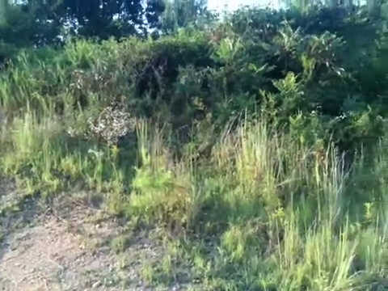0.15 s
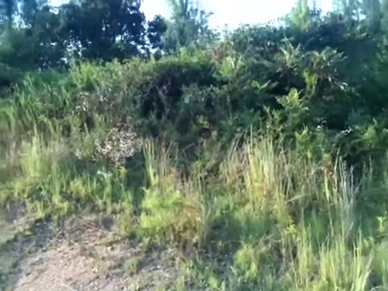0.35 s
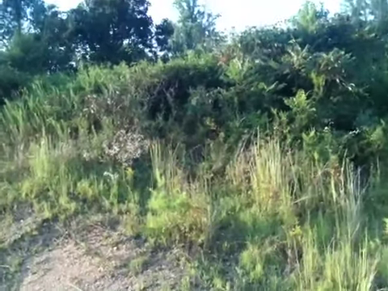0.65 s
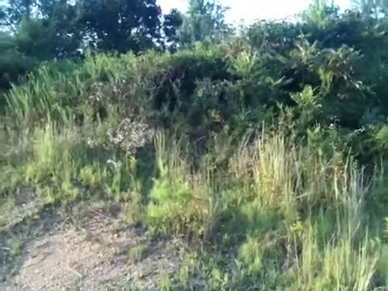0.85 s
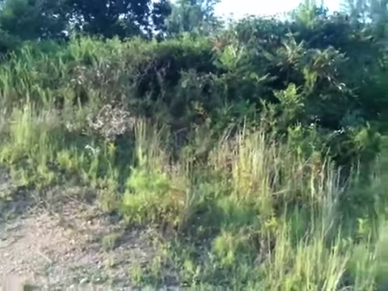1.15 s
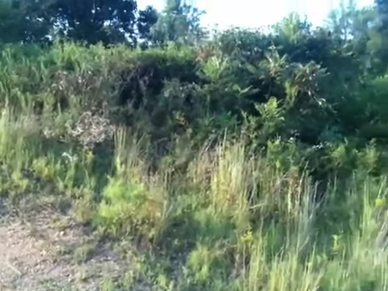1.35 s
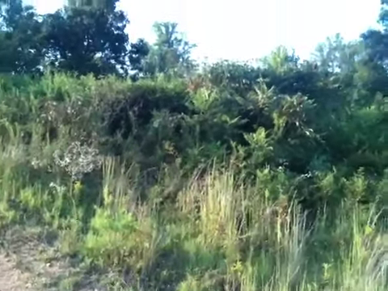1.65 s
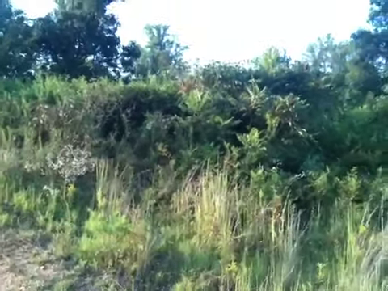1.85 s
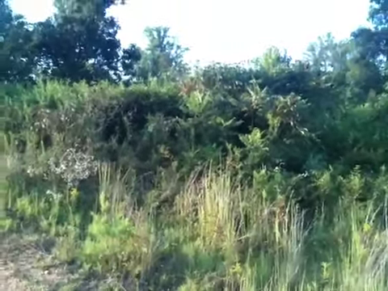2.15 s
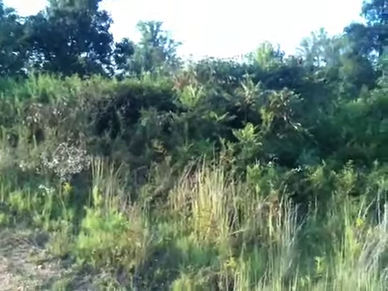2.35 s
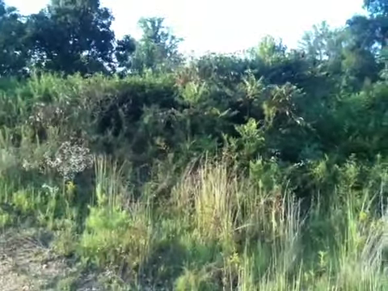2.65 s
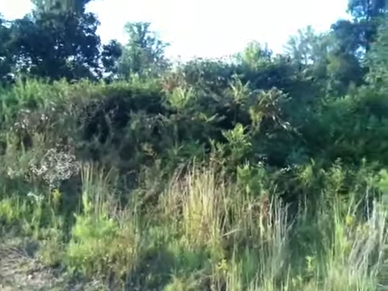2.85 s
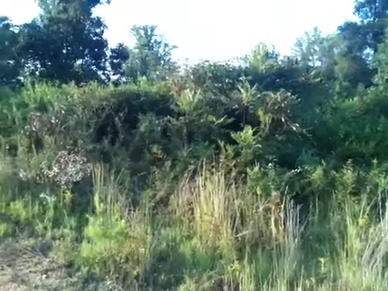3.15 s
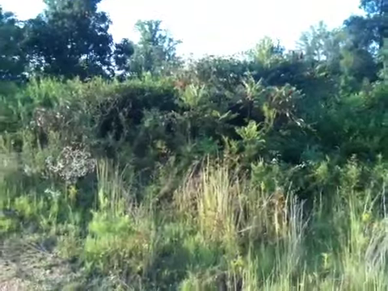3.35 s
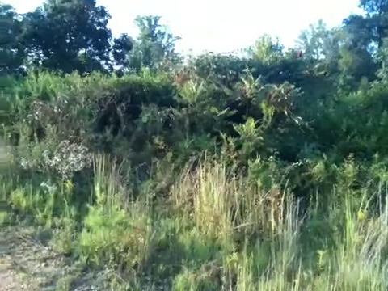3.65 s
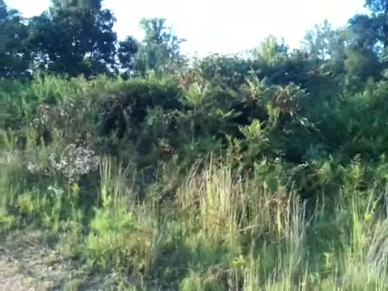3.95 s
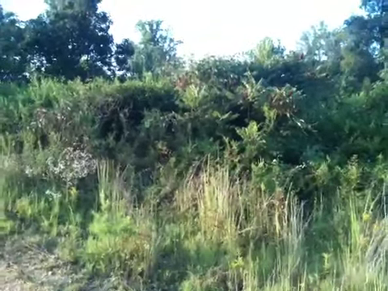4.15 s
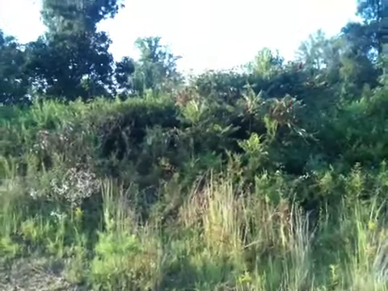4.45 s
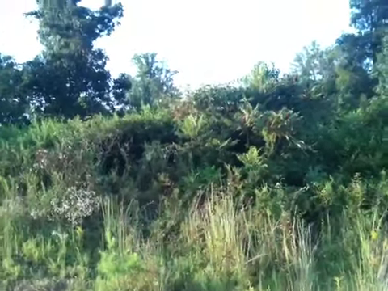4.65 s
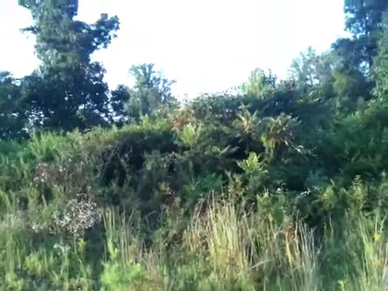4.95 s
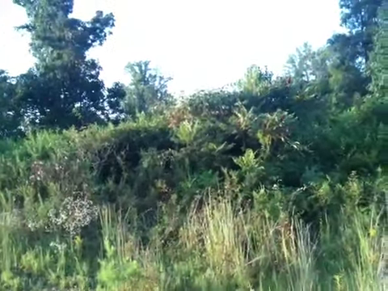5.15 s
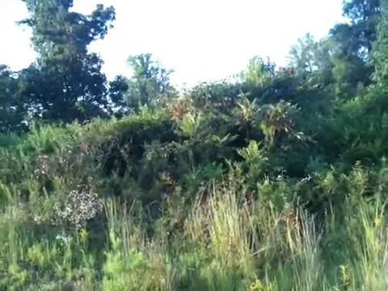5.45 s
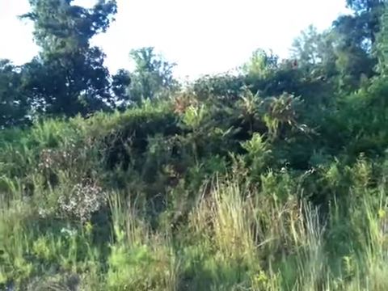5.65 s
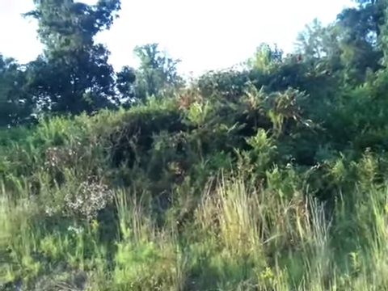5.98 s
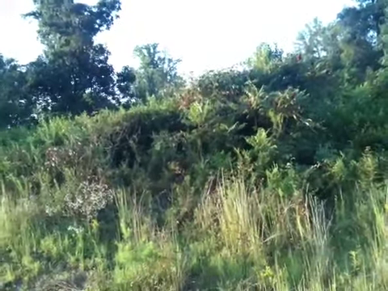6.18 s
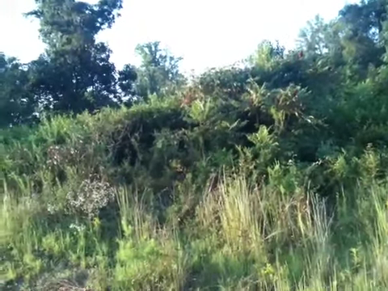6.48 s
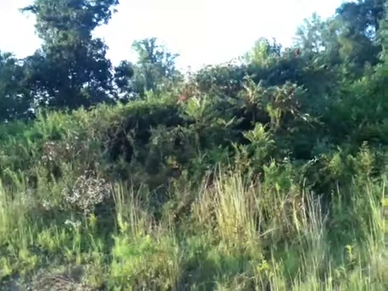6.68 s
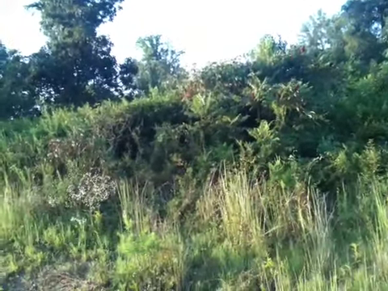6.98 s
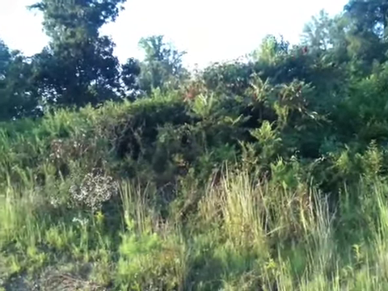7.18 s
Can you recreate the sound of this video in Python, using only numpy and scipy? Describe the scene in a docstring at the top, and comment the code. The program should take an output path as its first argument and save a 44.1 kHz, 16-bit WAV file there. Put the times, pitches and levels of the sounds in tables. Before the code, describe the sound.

A small single-cylinder four-stroke engine revs in four hard, raspy bursts beyond brush, coasting between them, then sinks toward idle amid crickets.

```python
"""A single-cylinder four-stroke engine putters some way off; a second, raspier one fades within a second.
The throttle opens in four short, hard bursts and a few gentle ones; between them the engine coasts,
and at last it sinks towards idle. Each firing rings a silencer and hisses; brush and trees scatter it.
Low tones, churn, clatter and drone follow the engine cycle. Gliding tones make crickets and noise makes
a far chorus and a late katydid; a faint bird whistles once."""
import sys
import numpy as np
from scipy import signal
from scipy.fft import rfft, irfft
from scipy.io import wavfile

SR = 44100
rng = np.random.default_rng(int(sys.argv[2]) if len(sys.argv) > 2 else 0)


def dump_mix(stems):
    """Bounce the given channels to the path in sys.argv[1] as a 16-bit WAV at rate SR."""
    frames = np.atleast_2d(stems).T  # one column per channel
    limited = np.clip(frames, -1, 1)  # hard clip at full scale
    pcm = np.round(limited * 32767).astype(np.int16)
    wavfile.write(sys.argv[1], SR, pcm)


N = 322812
TIME = np.arange(N) / SR
CRUISE_PER_S = 42   # firings at an easy pace


def from_db(db):
    """Decibels to gain."""
    return 10 ** (np.asarray(db) / 20)


def rms_one(x):
    """Scale to rms 1."""
    return x / np.sqrt(np.mean(x ** 2) + 1e-20)


def in_time(rows, t=TIME):
    """Each column of a curve, read at times t."""
    s, *columns = np.transpose(rows)
    return [np.interp(t, s, c) for c in columns]


def coloured(x, spectrum):
    """Shape a signal by a spectrum that falls 20 dB per octave faster beyond its ends; rms 1."""
    hz, db = np.transpose(spectrum)
    octave = np.log2(np.fft.rfftfreq(N, 1 / SR) + 1)
    outside = abs(octave - np.clip(octave, np.log2(hz[0]), np.log2(hz[-1])))
    gain = from_db(np.interp(octave, np.log2(hz), db) - 20 * outside)
    return rms_one(irfft(rfft(x) * gain, N))


def band(x, low_hz, high_hz, order=2):
    """Band-pass."""
    return signal.sosfilt(signal.butter(order, [low_hz, high_hz], "band", fs=SR, output="sos"), x + 1e-18)


def drift(rate):
    """Slow random curve through normal points of spread 1, rate points per second."""
    points = rng.standard_normal(400)
    return np.interp(TIME * rate, np.arange(len(points)), points)


# Speed with the throttle shut, set by ground and gear. Each row: time in seconds, firings per second.
COAST_SPEED = [(0.0, 45.61), (0.25, 44.63), (0.458, 44.43), (0.75, 40.99), (0.986, 37.94), (1.5, 38.83),
               (1.985, 40.09), (2.35, 42.14), (2.55, 42.96), (2.8, 45.42), (3.15, 43.66), (3.65, 40.57),
               (3.75, 41.85), (3.87, 40.27), (4.249, 38.23), (4.717, 38.7), (5.12, 30.59), (5.22, 27.41),
               (5.45, 29.93), (5.739, 32.9), (6.1, 31.03), (6.675, 26.81), (7.32, 26.33)]
# Throttle openings. Each row: open in seconds, shut in seconds, added firings per second if held,
# rev-up time in seconds, swell time in seconds, beat level at the crest in dB, sag in dB per second
# away from the crest, silencer pitch factor at the crest, nasal ring in dB, gas rush in dB.
THROTTLE_BURSTS = [(0.0, 0.272, 0, 0.16, 0.0091, -46, 13, 1.1, 3, 7),
                   (0.306, 0.742, 6.5, 0.19, 0.017, -44, -2, 0.97, 14.5, 4),
                   (0.926, 1.456, 25, .181, 0.002, -21, 5, 1.031, 0.5, -2.5),
                   (1.581, 1.928, 24.5, .174, 0.017, -20, 9, 1.024, 1, 0),
                   (2.041, 2.371, 24.5, .199, 0.057, -19.5, 17, 0.99, 10, -2),
                   (2.4, 2.576, 0, .1, .004, -44.5, 29.5, 0.94, 18, 0),
                   (3.728, 4.645, 6, 0.0039, 0.044, -38, 5.5, 0.94, 13.5, -4),
                   (4.829, 5.147, 21, 0.23, 0.046, -19.3, 25.5, 0.91, -2, -5.5)]
SPIN_DOWN_S = .1648


def engine_speed():
    """Firings per second: each burst pulls the flywheel above its coasting speed, then it spins down."""
    speed = in_time(COAST_SPEED)[0]
    for open_s, shut_s, added, rev_s, *_ in THROTTLE_BURSTS:
        pulled = 1 - np.exp(-(np.clip(TIME, open_s, shut_s) - open_s) / rev_s)
        spin_down = np.exp(-np.maximum(TIME - shut_s, 0) / SPIN_DOWN_S)
        speed = speed + added * pulled * spin_down
    return speed


# Beats with the throttle shut. Each row: time in seconds, beat level in dB.
PUTTER_LEVEL = [(0.3, -57), (0.8, -55), (1.5, -40.5), (2.0, -53), (2.7, -53), (3.6, -42.5), (3.72, -54),
                (4.7, -51.5), (5.19, -61.5), (5.27, -45), (5.5, -48.5), (6.1, -59), (6.7, -66)]
PUTTER_NASAL_DB, PUTTER_RUSH_DB = -2.5, 1.5
COOLING_POWER = 0.21   # coasting: silencer pitch sinks with speed as it cools
BEAT_LEAD_S, SHUT_S = 0.019, 0.014   # beats swell before the speed rises; they die quickly on shutting
FULL_REV_PER_S = 33.7   # added firings that count as full load
CREST_SHARE = 0.24   # crest of a burst, as a share of its length
RING_SAG_PER_S = 0.027   # share by which silencer pitch sinks each second of a burst


def throttle(t, speed):
    """Opening, load, beat dB, silencer pitch, nasal dB and rush dB at times t: bursts swell, sag and shut."""
    still = np.zeros(len(t))
    putter_db = in_time(PUTTER_LEVEL, t)[0]
    cooled = (speed / CRUISE_PER_S) ** COOLING_POWER
    state = np.array([still, still, putter_db, cooled, still + PUTTER_NASAL_DB, still + PUTTER_RUSH_DB])
    for open_s, shut_s, added, _, swell_s, peak_db, sag, pitch, nasal_db, rush_db in THROTTLE_BURSTS:
        swell = .5 * (1 + np.tanh((t - open_s + BEAT_LEAD_S) / swell_s))
        opening = swell * np.clip(1 - (t - shut_s) / SHUT_S, 0, 1)
        past_crest_s = t - (open_s + CREST_SHARE * (shut_s - open_s))
        beat_db = peak_db - sag * abs(past_crest_s)
        heat = pitch * (1 - RING_SAG_PER_S * past_crest_s)
        driven = np.broadcast_arrays(1, added / FULL_REV_PER_S, beat_db, heat, nasal_db, rush_db)
        state = state + opening * (np.array(driven) - state)
    return state


# Single firings that stand out, as hard pops or a misfire.
# Each row: time in seconds, peak level in dB, extra crack of gas in dB.
POP_FIRINGS = [(.306, -39, 6), (.373, -37, 1.5), (.476, -41, -3.5), (.885, -27, 4), (.91, -50.5, 2),
               (.935, -22.5, 5), (1.099, -19, -1), (2.066, -25.5, 4), (2.103, -19.5, -0.5), (2.121, -19, 4),
               (4.825, -28.5, 0), (4.85, -23.5, 1.5), (4.899, -20, 3.5), (4.946, -19.5, 1.5),
               (4.969, -20.5, -5), (4.992, -20.5, 1), (5.059, -23.5, 5), (5.081, -20.5, -0.5),
               (5.166, -38.5, 3.5), (5.358, -43, 5), (5.389, -42.5, 3), (5.447, -37.5, 5),
               (5.543, -43.5, -11), (5.663, -47, 5.5), (5.695, -42.5, -2), (5.786, -45, 5),
               (5.815, -42, -4), (5.909, -47.5, 3.5), (5.94, -45, 1), (6.035, -46.5, -11),
               (6.066, -44.5, 3.5), (6.163, -52.5, 7), (6.23, -52.5, 6), (6.33, -42.5, -1.5),
               (6.433, -39, -0.5), (6.65, -42, 3.5), (6.688, -51.5, 4)]
FIRM_BEAT_DB, UNEVEN_DB, UNEVEN_PER_DB = -14, 0.5, 0.0564   # scatter grows for each dB below firm


def firings(t, beat_db, rush_db):
    """Strength and crack (dB) of the firings: the weaker, the more uneven; listed ones pop or misfire."""
    uneven_db = UNEVEN_DB + UNEVEN_PER_DB * np.maximum(FIRM_BEAT_DB - beat_db, 0)
    level_db = beat_db + uneven_db * np.clip(rng.standard_normal(1000)[:len(t)], -2, 1)
    crack_db = rush_db.copy()
    for s, pop_db, extra_db in POP_FIRINGS:
        nearest = np.argmin(abs(t - s))
        level_db[nearest] = pop_db
        crack_db[nearest] += extra_db
    return from_db(level_db), crack_db


# Silencer resonances. Each row: centre in Hz at heat 1, width in Hz, relative level in dB,
# share of the nasal ring 0-1, share of the crack 0-1, share of the shift with heat 0-1.
SILENCER_MODES = [(573.3, 149, 5.5, 0.29, 0, 1), (425.4, 109, -4, 0.1, 0.3, .3),
                  (846, 150, -22.5, 1, 0.2, 0), (1072, 145, -11, 0.81, 0.4, 0.1),
                  (1194, 90, -21.5, 0.4, .2, .1), (1753, 310, -20, 0, 0.85, 0.8),
                  (2204, 200, -25, 0.1, 0.6, 0.5), (2730, 230, -42, 0.05, 0.6, .3),
                  (3380, 310, -47.5, 0.6, 0.4, .3), (60, 130, -28.5, 0.1, 0.07, 0.12)]
PITCH_SPREAD = .015   # random share per puff


def silencer_rings(heat, nasal_db, crack_db, chance_db=3.5, damping_s=0.0038, size=4096, count=800):
    """The causal ring of the silencer for each puff, damped within a few cycles; peak 1."""
    f = np.fft.rfftfreq(size, 1 / SR) + 1
    chance = rng.standard_normal((len(SILENCER_MODES), 2, 1000))[..., :len(heat)]
    power = 1e-7   # floor keeps the logarithm finite
    for (hz, width, db, nasal, crack, warm), (luck, detune) in zip(SILENCER_MODES, chance):
        centre = (hz * heat ** warm * (1 + PITCH_SPREAD * detune))[:, None]
        bump = 1 / (1 + abs((f * f - centre ** 2) / (f * width)) ** 5)
        # the higher a resonance, the more its level varies from puff to puff
        level_db = db + nasal * nasal_db + crack * crack_db + chance_db * luck * hz / 2000
        power = power + from_db(level_db)[:, None] ** 2 * bump
    # minimum phase: keep the causal half of the cepstrum
    cepstrum = irfft(np.log(power))[:, :size // 2]
    rings = irfft(np.exp(rfft(cepstrum, size)))[:, :count]
    rings = rings / (1 + (np.arange(count) / (SR * damping_s)) ** 4)
    return rings / abs(rings).max(axis=1, keepdims=True)


def exhaust(at, strength, heat, nasal_db, crack_db):
    """Every puff rings the silencer, higher when the gas is hot, brighter when it cracks."""
    rings = silencer_rings(heat, nasal_db, crack_db)
    length = rings.shape[1]
    out = np.zeros(N + length)
    for i, gain, ring in zip(at, strength, rings):
        out[i:i + length] -= gain * ring
    return out[:N]


def puffs(at, strength, rise_s, decay_s):
    """A short turbulent hiss at each firing."""
    clicks = np.zeros(N)
    clicks[at] = strength
    age = TIME[:SR // 20]
    envelope = (1 - np.exp(-age / rise_s)) * np.exp(-age / decay_s)
    gate = signal.fftconvolve(clicks, envelope)[:N]
    return gate * rng.standard_normal(N)


# Spectrum of the gas rush. Each row: frequency in Hz, relative level in dB per Hz.
RUSH_SPECTRUM = [(300, -10.5), (650, -8), (880, -14.5), (1110, -3), (1380, -13.5), (1720, -10),
                 (1970, -14.5), (2220, -12.5), (2450, -23.5), (2630, -19.5), (3150, -25), (3550, -22.5),
                 (4300, -28.5), (5000, -31.5), (8000, -65)]


def gas_rush(at, strength, rush_db=-19.5):
    """Gas hisses out of the pipe after each puff."""
    hiss = puffs(at, strength, rise_s=0.0013, decay_s=0.0072)
    return from_db(rush_db) * np.std(hiss) * coloured(hiss, RUSH_SPECTRUM)


FULL_PER_S = 59.3   # firings at the top of a burst


def rasp(at, strength, speed, rasp_db=-17.5, db_per_octave=24):
    """At high revs the front of each puff steepens into a crisp snap."""
    snap_db = rasp_db + db_per_octave * np.log2(speed / FULL_PER_S)
    snaps = puffs(at, strength * from_db(snap_db), rise_s=.00008, decay_s=0.0011)
    return band(snaps, 2550, 4190, order=4)


def scatter(x, t60, level_db, delay_s, low_hz=750):
    """Countless weak reflections, dying away; leaves let long waves pass."""
    arrival = np.clip(TIME / delay_s - 1, 0, 1)
    echoes = band(rng.standard_normal(N), low_hz, 4600) * from_db(-60 * TIME / t60) * arrival
    echoes = echoes / np.sqrt(np.sum(echoes ** 2))
    return from_db(level_db) * signal.fftconvolve(x, echoes)[:N]


# Tailpipe resonance. Each row: frequency in Hz, rms level in dB before order, load and carry offsets.
TAILPIPE_RESPONSE = [(60, -110), (82, -74.5), (104, -65), (125, -64), (160, -63.5), (185, -83), (215, -66),
                     (250, -77)]
# Orders 2 upward of the firing rate. Each row: offset in dB with throttle shut, offset in dB with it open.
ORDER_OFFSETS = [(-2.5, -0.5), (-3, -7), (-4.5, -17)]
# The machine moving off through cover; also played by machinery().
# Each row: time in seconds, level offset in dB, valve-gear clatter in dB rms at the easy pace.
CARRY_LEVEL = [(0, 1.5, -59), (.35, 1, -61), (.55, -2.5, -69), (.9, -2.5, -60), (2.5, 1.5, -59),
               (3.1, -1.5, -62), (3.5, -3, -68.5), (4.7, -6, -71), (5.5, -6, -67.5), (5.78, -3.5, -67),
               (6.1, -8, -71), (6.7, -10, -70), (7.3, -17.5, -73)]
BOOM_LOAD_DB, BOOM_FOLLOWS = 10.5, 0.41   # gain at full load; share of the carry offset


def boom(cycle, speed, opened, load, waver_db=2.5, rumble_db=-74):
    """Pumped gas hums on low orders, swelling across the tailpipe's resonance, over a soft rumble."""
    hz, pipe_db = np.transpose(TAILPIPE_RESPONSE)
    drive_db = BOOM_LOAD_DB * load + BOOM_FOLLOWS * in_time(CARRY_LEVEL)[0]
    rumble = rms_one(band(rng.standard_normal(N), 80, 190, order=3))
    out = from_db(rumble_db + 2 * drift(4.82)) * rumble
    for order, (shut_db, open_db) in enumerate(ORDER_OFFSETS, 2):
        resonance_db = np.interp(np.log(order * speed), np.log(hz), pipe_db)
        level_db = resonance_db + shut_db + opened * (open_db - shut_db) + drive_db
        level_db = level_db + waver_db * (CRUISE_PER_S / speed) ** 2 * drift(23)
        out += np.sqrt(2) * from_db(level_db) * np.sin(2 * np.pi * order * cycle)
    return out


def contacts(cycle, speed, likeness, steady_per_s=42, size=500):
    """Dense small impacts; each engine cycle resembles the last, less so as the speed sags towards idle."""
    pace = np.interp(np.arange(int(cycle[-1]) + 2), cycle, speed)
    kept = np.clip(likeness, 0, .97) * np.minimum(pace / steady_per_s, 1) ** 4
    pattern = rng.standard_normal((500, size))[:len(kept)]
    for k in range(1, len(kept)):
        pattern[k] = kept[k] * pattern[k - 1] + np.sqrt(1 - kept[k] ** 2) * pattern[k]
    return np.interp(cycle * size, np.arange(pattern.size), pattern.ravel())


# Spectrum of the drive's churn. Each row: frequency in Hz, relative level in dB per Hz.
CHURN_SPECTRUM = [(88, -30.5), (150, -3.5), (199, -25), (235, -4), (412, 1.5), (487, 1), (669, -3),
                  (807, -15), (1110, -12.5), (1250, -12.5), (1400, -27), (1820, -47), (3080, -120)]
# Spectrum of the valve gear. Each row: frequency in Hz, relative level in dB per Hz.
CLATTER_SPECTRUM = [(700, 8.5), (1080, 5), (1380, 3.5), (1680, 9.5), (1960, 4), (2170, 2), (2500, -8),
                    (3100, -12), (3380, -12), (5000, -23.5)]
CHURN_DB = -56   # rms before the carry offset
CLATTER_DB_PER_OCTAVE = 9.5   # per octave of speed


def machinery(cycle, speed, churn_throb_db=1.5, clatter_throb_db=0.5):
    """Drive and valve gear churn and clatter, swelling once a cycle."""
    carry_db, valves_db = in_time(CARRY_LEVEL)
    clatter_db = valves_db + CLATTER_DB_PER_OCTAVE * np.log2(speed / CRUISE_PER_S)
    swing = np.cos(2 * np.pi * (cycle - .15))
    churn = contacts(cycle, speed, likeness=0.31) * from_db(churn_throb_db * swing)
    clatter = contacts(cycle, speed, likeness=0.12) * from_db(clatter_throb_db * swing + 0.79 * drift(25))
    churn = from_db(CHURN_DB + carry_db) * coloured(churn, CHURN_SPECTRUM)
    return churn + from_db(clatter_db) * coloured(clatter, CLATTER_SPECTRUM)


# Drone as the wheels push the engine. Each row: frequency in Hz, relative level in dB.
DRONE_SPECTRUM = [(280, -8), (380, -1), (480, 0), (570, -5.5), (670, 0.5), (800, -18), (960, -1.5),
                  (1150, -10.5), (1350, -26)]
# Overrun. Each row: time in seconds, level of the tone stack in dB rms.
OVERRUN_LEVEL = [(2.3, -78), (2.55, -57.5), (3.1, -60), (3.6, -60.5), (3.75, -78)]


def drone(cycle, speed, hum_db=-14, waver_db=5.0, count=28):
    """On the overrun the drive meshes alike every cycle: a stack of tones over a hum, following speed."""
    hz, db = np.transpose(DRONE_SPECTRUM)
    mesh = 0
    for order in range(6, count):
        gain = from_db(np.interp(order * speed, hz, db) + waver_db * drift(11))
        mesh = mesh + gain * np.sin(2 * np.pi * (order * cycle + rng.random()))
    hum = np.sqrt(2) * np.sin(2 * np.pi * 3 * cycle)
    return from_db(in_time(OVERRUN_LEVEL)[0]) * (rms_one(mesh) + from_db(hum_db) * hum)


# Second engine easing its throttle. Each row: time in seconds, firings per second.
FAR_ENGINE_SPEED = [(0, 53.5), (.128, 56), (.25, 57.3), (.32, 54.5), (.4, 51.5), (.5, 48.8), (.6, 47.7),
                    (.85, 48.5)]
# Its fade. Each row: time in seconds, level in dB.
FAR_ENGINE_LEVEL = [(0, -58), (.35, -61.5), (.47, -66), (.78, -67), (.9, -98)]
# Its barks, set on the nearest firing. Each row: time in seconds, extra level in dB.
FAR_ENGINE_BARKS = [(.128, 2.5), (.166, 5.5), (.201, -2.5), (.235, 1), (.253, 1.5), (.306, 5.5), (.4, 7.5),
                    (.541, 7.5)]
# Its pipe resonances. Each row: centre in Hz, width in Hz, relative level in dB.
FAR_PIPE_MODES = [(634, 350, 2.5), (1010, 280, 1.5), (1690, 240, -1.5), (2190, 150, -4), (3380, 270, -16)]


def far_engine(uneven_db=2.5, hiss=0.12):
    """Each firing rings the pipe with a click and a little hiss; every resonance varies on its own."""
    cycle = np.cumsum(in_time(FAR_ENGINE_SPEED)[0]) / SR
    at = np.flatnonzero(np.diff(np.floor(cycle)))
    bark_db = np.zeros(len(at))
    for s, extra_db in FAR_ENGINE_BARKS:
        bark_db[np.argmin(abs(TIME[at] - s))] = extra_db
    out = 0
    for k, (hz, width, db) in enumerate(FAR_PIPE_MODES):
        strength = from_db(bark_db + uneven_db * rng.standard_normal(1000)[:len(at)])
        beats = hiss * puffs(at, strength, rise_s=0.00018, decay_s=0.0023)
        beats[at] += strength
        ring = rms_one(band(beats, hz - width / 2, hz + width / 2))
        out = out + (-1) ** k * from_db(db) * ring
    return from_db(in_time(FAR_ENGINE_LEVEL)[0]) * rms_one(out)


def cricket(hz, fall_hz, per_s, level_db, scatter_hz=45, top=0.2):
    """Each wing stroke is a near-pure tone that arches over and slides down as it fades."""
    stroke = (per_s * TIME + 0.14 * drift(2)) % 1
    arch = fall_hz * ((stroke - top) / (1 - top)) ** 2
    pitch = hz - arch + 25 * drift(3) + scatter_hz * drift(50)
    swell = np.sin(np.pi * stroke) ** 2 * np.exp(-3 * stroke) * from_db(drift(33))
    return from_db(level_db) * rms_one(swell * np.sin(2 * np.pi * np.cumsum(pitch) / SR))


# Far chorus and faint hiss. Each row: frequency in Hz, relative level in dB per Hz.
CHORUS_SPECTRUM = [(2500, -17), (4700, -20), (5250, -11.5), (5750, -7.5), (6500, -12), (7000, -5),
                   (7500, -1.5), (8100, -6.5), (8500, -17), (9000, -24.5), (12000, -22.5), (15500, -20)]
# Nearest cricket, which stops near the end.
# Each row: time in seconds, pitch at the top of a stroke in Hz, level in dB.
SOLO_CRICKET = [(0, 8210, -74.5), (1.5, 8190, -73.5), (1.57, 7800, -73), (2.8, 8060, -86), (3.6, 8050, -72),
                (4.7, 8180, -77.5), (5.3, 8150, -70), (6.35, 8240, -72.5), (6.45, 8020, -72),
                (6.78, 8140, -72), (6.84, 8050, -92)]
SOLO_FALL_HZ, SOLO_STROKES_PER_S = 806, 28.1
# Other crickets. Each row: pitch at the top of a stroke in Hz, fall in Hz, strokes per second, rms in dB.
CRICKET_TRILLS = [(7530, 450, 30, -75.5), (7800, 510, 42, -81)]
# Katydid coming in. Each row: time in seconds, level in dB.
KATYDID_LEVEL = [(0, -105), (6.0, -89), (6.6, -86), (6.9, -81), (7.3, -78)]


def insects(chorus_db=-67.0, sway_db=0.3, tick_db=6):
    """A smooth far chorus, a few nearer crickets and the thin, uneven ticking of a katydid."""
    chorus = coloured(rng.standard_normal(N), CHORUS_SPECTRUM)
    chorus = from_db(chorus_db + sway_db * drift(2.9)) * chorus
    solo_hz, solo_db = in_time(SOLO_CRICKET)
    crickets = cricket(solo_hz, SOLO_FALL_HZ, SOLO_STROKES_PER_S, solo_db)
    crickets = crickets + sum(cricket(*row) for row in CRICKET_TRILLS)
    rasps = np.cos(2 * np.pi * 12.62 * TIME)   # 12.62 ticks per second
    ticking = from_db(tick_db * rasps + drift(13))
    katydid = rms_one(ticking * band(rng.standard_normal(N), 11000, 15500))
    return chorus + crickets + from_db(in_time(KATYDID_LEVEL)[0]) * katydid


CHIRP_MIDDLE_S, CHIRP_LENGTH_S, CHIRP_HZ, CHIRP_PEAK_DB = 4.24, .1, 3200, -74.5


def bird(waver_hz=25):
    """One faint, slightly wavering whistle: a sine under a half-cosine swell."""
    swell = np.cos(np.pi * np.clip((TIME - CHIRP_MIDDLE_S) / CHIRP_LENGTH_S, -.5, .5))
    pitch = CHIRP_HZ + waver_hz * drift(50)
    return from_db(CHIRP_PEAK_DB) * swell * np.sin(2 * np.pi * np.cumsum(pitch) / SR)


def scene():
    """The engine, firing once a cycle among the brush and trees, with the far engine, insects and bird."""
    speed = engine_speed()
    cycle = .268 + np.cumsum(speed) / SR
    at = np.flatnonzero(np.diff(np.floor(cycle)))   # sample of each firing
    opened, load, beat_db, heat, nasal_db, rush_db = throttle(TIME[at], speed[at])
    strength, crack_db = firings(TIME[at], beat_db, rush_db)
    beats = exhaust(at, strength, heat, nasal_db, crack_db)
    beats = beats + gas_rush(at, strength * from_db(crack_db))
    beats = beats + rasp(at, strength, speed[at])
    brush = scatter(beats, t60=0.14, level_db=-24.0, delay_s=0.0015)
    trees = scatter(beats, t60=0.72, level_db=-20.5, delay_s=0.025)
    hum = boom(cycle, speed, np.interp(TIME, TIME[at], opened), np.interp(TIME, TIME[at], load))
    engine = beats + brush + trees + hum + machinery(cycle, speed) + drone(cycle, speed)
    return (engine + far_engine() + insects() + bird())[None]


CUTOFF_HZ = 15800


def record(dry):
    """A steep elliptic low-pass cuts the top."""
    return signal.sosfilt(signal.ellip(10, .2, 70, CUTOFF_HZ, fs=SR, output="sos"), dry)


dry = scene()
out = record(dry)
dump_mix(out)
```